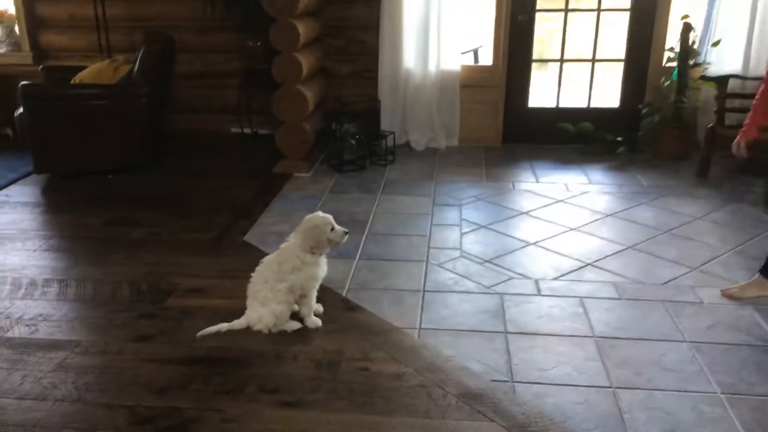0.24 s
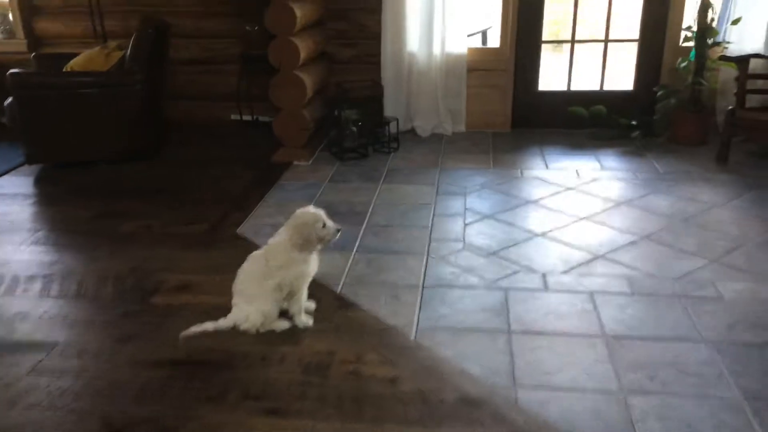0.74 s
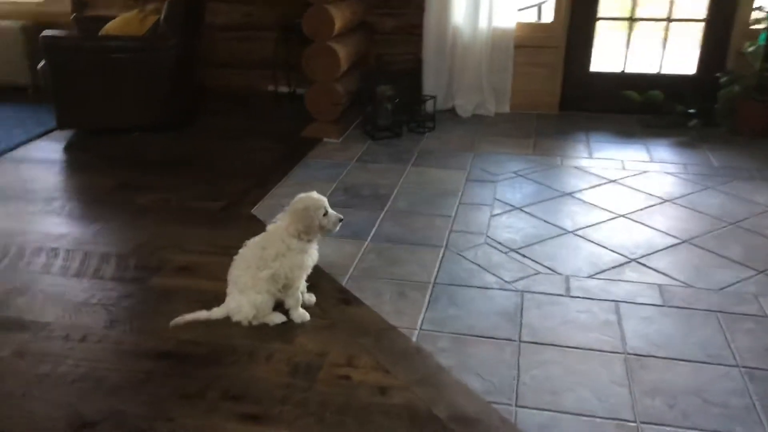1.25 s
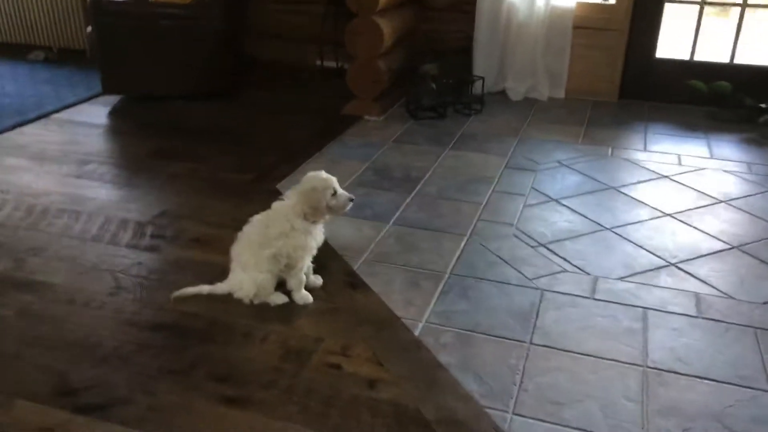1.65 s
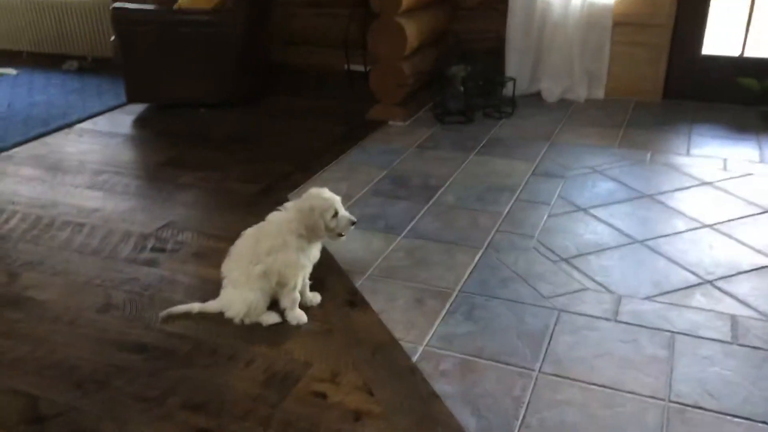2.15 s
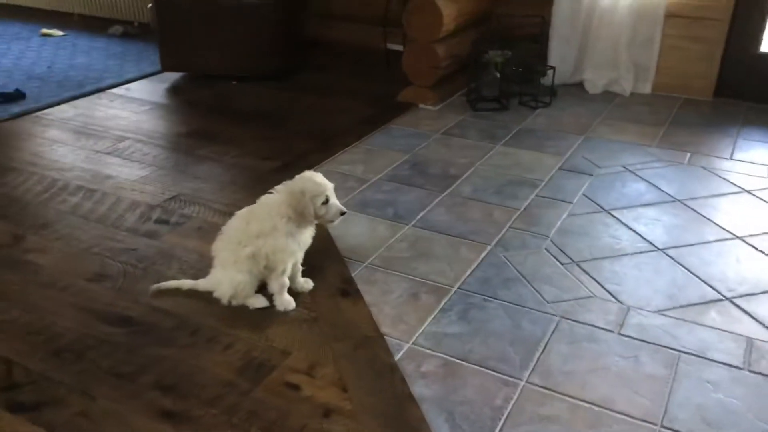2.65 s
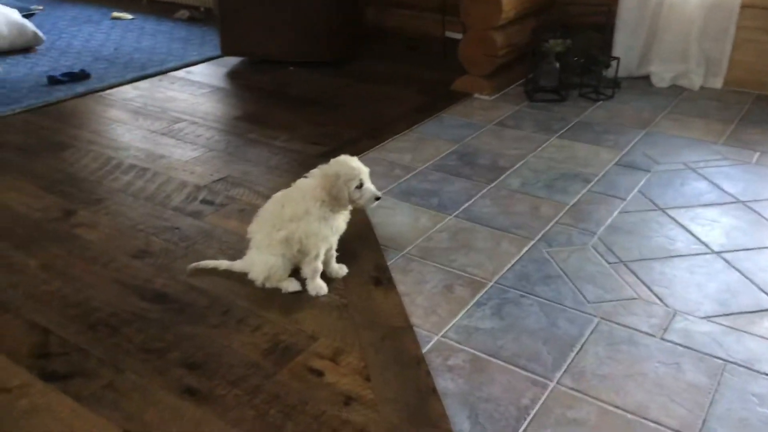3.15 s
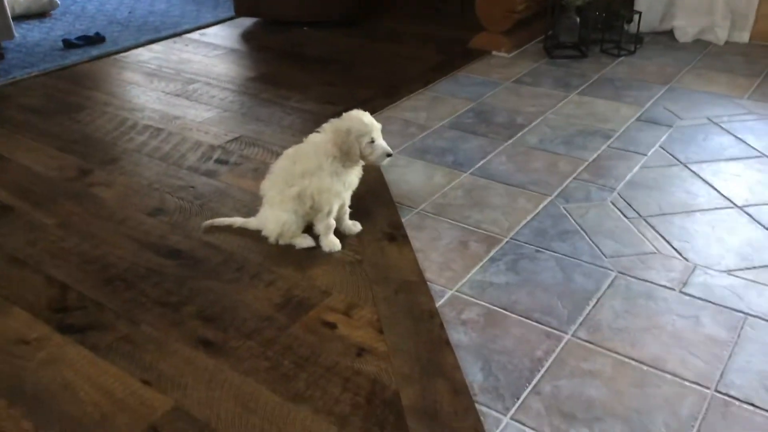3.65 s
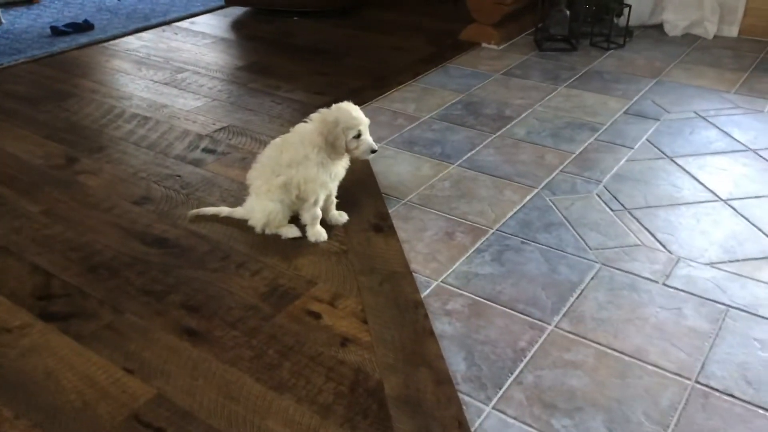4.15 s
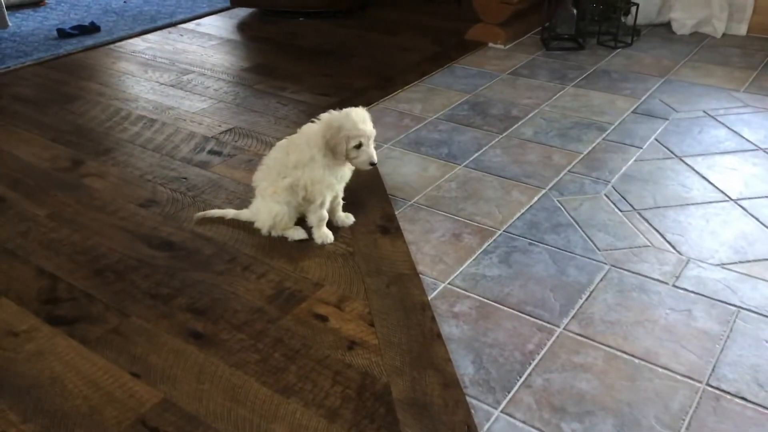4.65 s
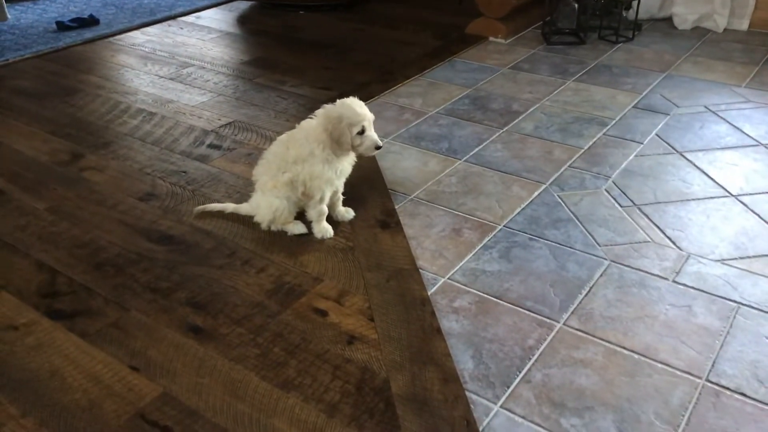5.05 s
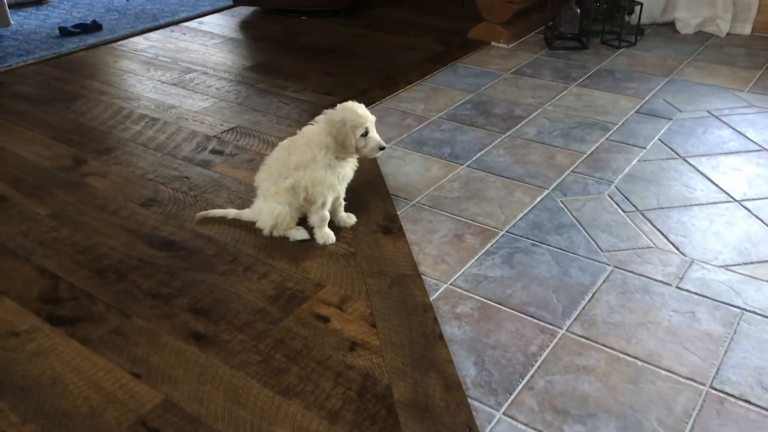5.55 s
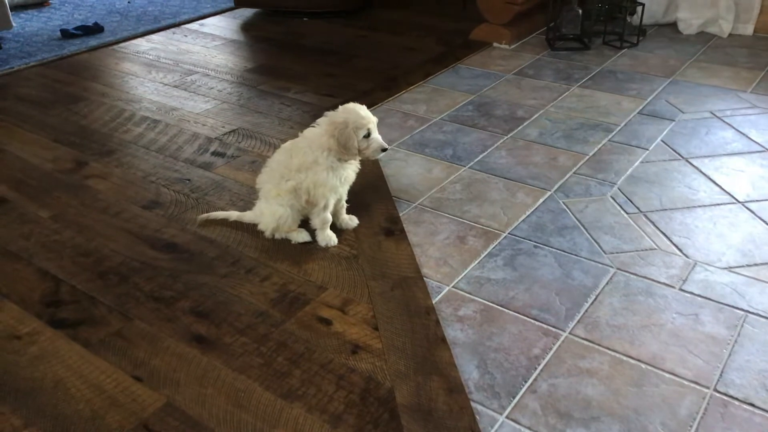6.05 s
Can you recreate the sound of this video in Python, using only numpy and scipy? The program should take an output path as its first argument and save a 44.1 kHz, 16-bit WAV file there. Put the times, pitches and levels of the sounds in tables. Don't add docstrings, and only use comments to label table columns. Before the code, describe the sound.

Soft footsteps and small scuffs and ticks on a wooden floor, then hollow knocks, two loudest mid-way, then a softer even run of taps indoors.

```python
import sys
import numpy as np
from scipy import signal
from scipy.fft import rfft, irfft, next_fast_len
from scipy.io import wavfile
from scipy.ndimage import map_coordinates

SR = 44100
rng = np.random.default_rng(int(sys.argv[2]) if len(sys.argv) > 2 else 0)


def wav_record(signal):
    frames = np.transpose(np.atleast_2d(signal))
    bounded = np.clip(frames, -1, 1)
    quanta = np.round(bounded * 32767).astype(np.int16)
    wavfile.write(sys.argv[1], SR, quanta)


def level_to_linear(level):
    exponent = np.asarray(level, float) / 20
    return 10 ** exponent


N = 277389
TAIL = 5 * SR // 8

# (time [s], crack peak [dB], boom [dB], body [dB re crack], brightness [dB re crack])
KNOCKS = [(0.8827, -62, -57.5, 13, -7), (1.0111, -47.5, -71, -22, -37), (1.0965, -53, -53, -9, -14),
          (1.542, -43.5, -29, -6.5, -6.5), (1.7387, -34, -25.5, -10, -10), (1.9066, -32, -34.5, -1.5, -7),
          (2.1262, -36, -33.5, -6, -8), (3.1268, -27, -22.5, -5, -7), (3.327, -17.5, -21.5, -1, -4.5),
          (4.985, -45, -43, -4, -14), (5.1588, -48, -43.5, -3, -11.5), (5.3349, -55, -50.5, -1.5, -14),
          (5.5412, -46, -44, -3, -13.5), (5.7445, -48, -41, -5, -11), (5.9419, -45.5, -35, 1.5, -13.5),
          (6.1405, -39, -37.5, -6, -15)]
# (frequency [Hz], width [Hz], level [dB])
CASE = [(1347, 333, 13), (3318, 570, 13), (5340, 540, 6), (6305, 170, 14.5), (8790, 670, 21),
        (11000, 360, 15), (13940, 840, 6)]
# (frequency [Hz], level [dB])
CRACK = [(150, -22.5), (300, 3), (500, 8.5), (900, 2), (1400, -8), (1750, -12.5), (2600, -19), (4400, -28),
         (5800, -33.5), (7500, -43), (10000, -47.5), (12300, -36.5), (16000, -48.5)]


def unit(x):
    return x / np.sqrt(np.mean(x ** 2) + 1e-20)


def along(points, hz):
    f, v = np.transpose(points)
    return np.interp(np.log(hz + 1), np.log(f + 1), v)


def curve(points):
    return lambda hz: level_to_linear(along(points, hz))


def bell(hz, centre, width):
    return 1 / (1 + (2 * (hz - centre) / width) ** 2)


def humps(peaks, hz):
    return sum(db * bell(hz, centre, width) for centre, width, db in peaks)


def wobble(rate):
    knots = rng.standard_normal(int(N * rate / SR) + 4)
    return map_coordinates(knots, [np.arange(N) * rate / SR])


def coloured(x, gain):
    m = 2 * next_fast_len(len(x) // 2 + 4096)
    cepstrum = irfft(np.log(gain(np.fft.rfftfreq(m, 1 / SR)) + 1e-6), m)
    cepstrum[1:m // 2] *= 2
    cepstrum[m // 2 + 1:] = 0
    return irfft(rfft(x, m) * np.exp(rfft(cepstrum)), m)[:len(x)]


def coloured_noise(gain):
    return unit(coloured(rng.standard_normal(N), gain))


def add(track, s, sound):
    track[round(s * SR):][:len(sound)] += sound


def rings(modes, t):
    return sum(sign * level_to_linear(db - 60 * t / t60) * np.sin(2 * np.pi * hz * t) for hz, db, t60, sign in modes)


def burst(rise, t60):
    t = np.arange(TAIL) / SR
    fade = level_to_linear(-60 * np.clip(t - rise, 0, 1) / t60)
    snap = rng.standard_normal(TAIL) * np.clip(t / rise, 0, 1) ** 2 * fade
    return snap / np.linalg.norm(snap)


def room_tail():
    # (frequency [Hz], t60 [s])
    room_t60 = [(100, 0.62), (500, 0.49), (1400, 0.48), (3300, 0.53), (7000, 0.49), (12000, 0.25)]
    hz, t, z = signal.stft(rng.standard_normal(TAIL), SR, nperseg=256)
    fade = level_to_linear(-60 * t / along(room_t60, hz)[:, None])
    tail = signal.istft(z * fade, SR, nperseg=256)[1][:TAIL]
    t = np.arange(TAIL) / SR
    lumps = map_coordinates(rng.standard_normal(200), [t * 160], order=1)
    tail = tail * np.clip(t / 0.012, 0, 1) * level_to_linear(1.5 * lumps * np.exp(-t / 0.1))
    return tail / np.linalg.norm(tail)


def contact(body_db, bright_db, shape=CRACK, case=1):
    tilt = [(850, body_db), (1050, 0.046), (1700, 0.022), (2600, bright_db + 15.0)]
    return lambda hz: level_to_linear(along(shape, hz) + case * humps(CASE, hz) + along(tilt, hz))


def rumble_level():
    rest_db, walking_db, walk_ends_s = -60.5, -63, 1.6
    shake_db, shake_s = -24, 0.092
    t = np.arange(N) / SR
    power = level_to_linear(2 * rest_db) + level_to_linear(2 * walking_db) * np.clip((walk_ends_s - t) / 0.097, 0, 1)
    for s, _, boom_db, *_ in KNOCKS:
        u = np.clip((t[round(s * SR):][:SR] - s) / shake_s, 0, None)
        add(power, s, (level_to_linear(boom_db + shake_db) * u * np.exp(1 - u)) ** 2)
    return np.sqrt(power)


def background():
    # (frequency [Hz], level [dB])
    rumble_colour = [(15, -39), (25, -7.5), (69, -2.5), (107, -3.5), (130, 0), (275, -10.5), (479, -26.5),
                     (697, -25), (997, -33.5), (1240, -29.5), (1800, -45), (2340, -65), (3960, -120)]
    # (frequency [Hz], width [Hz], level [dB])
    hum_peaks = [(107, 9.2, -7), (121.46, 12, 10), (148, 2.9, 0.5)]
    # (frequency [Hz], level [dB])
    hiss_colour = [(880, -42), (1500, -18), (1630, -4), (2210, -3), (2980, -4), (3240, 1), (3770, -5.5),
                   (4720, -4), (7780, -9.5), (8790, -7.5), (14200, -14.5)]
    hiss_top = [(14300, -3), (14600, -15.0)]
    rumble = coloured_noise(curve(rumble_colour))
    drone = coloured_noise(lambda hz: sum(level_to_linear(db) * bell(hz, c, w) for c, w, db in hum_peaks))
    hiss = coloured_noise(lambda hz: level_to_linear(along(hiss_colour, hz) + along(hiss_top, hz)))
    rumble = rumble_level() * level_to_linear(2.0 + 1.9 * wobble(2.3)) * rumble
    return rumble + level_to_linear(-66 + 4.2 * wobble(3.9)) * drone + level_to_linear(-81.5) * hiss


def squeak():
    # (start [s], end [s], frequency [Hz], width [Hz], level [dB])
    rub = (3, 4, 1727, 59.5, -80)
    start, end, centre, width, db = rub
    swell = np.sin(np.pi * np.clip((np.arange(N) / SR - start) / (end - start), 0, 1))
    tone = coloured_noise(lambda hz: bell(hz, centre, width))
    return level_to_linear(db + 2.5 * wobble(21.7)) * swell * tone


def grain(depth_db):
    return rng.standard_normal(N) * level_to_linear(depth_db * wobble(70))


def scuffs():
    # (time [s], hold [s], level [dB], brightness [dB re level], air [dB re brightness])
    strokes = [(0.0, 0.014, -77.5, -.5, -11), (0.124, 0.15, -85.5, 3, -11), (0.251, 0.067, -76, 3, -3),
               (0.375, .015, -66, -12.5, -1.5), (0.432, 0.012, -72, -5.5, -13),
               (0.629, .006, -73.5, -3, -4), (0.693, 0.068, -74.5, -2, -23), (0.879, 0.032, -60.5, -19, -7),
               (0.902, 0.068, -80, 6, -29), (0.974, 0.023, -76.5, -7, -1), (1.001, 0.018, -58.5, -19.5, -5),
               (1.065, 0.082, -66.5, -13, -6.5), (1.177, .08, -71.5, -13, -10),
               (1.33, 0.16, -71, -11.5, -9), (2.23, .04, -91, -19, 7), (2.287, 0.056, -74, 7, -17),
               (2.414, .13, -82.5, -2.5, -3), (2.596, .006, -75, -11, -8), (3.582, 0.28, -72.5, -19, -13),
               (3.903, .03, -72, -11.5, -20), (3.975, .03, -80.5, -22, -2),
               (4.556, 0.058, -86.5, -13.5, -1.5), (4.71, .02, -83, -12, -0.5)]
    rise, t60 = 0.012, 0.25
    bright_colour = [(1800, -11.0), (2800, -2.5), (4500, -8.0), (6000, -25)]
    airy_colour = [(4000, -27), (5500, 6), (8000, -10), (15000, -10)]
    dull = unit(coloured(grain(2.7), contact(-7.5, -29.5)))
    bright = unit(coloured(grain(1.4), lambda hz: level_to_linear(humps(CASE, hz) + along(bright_colour, hz))))
    airy = unit(coloured(grain(5.3), lambda hz: level_to_linear(1.15 * humps(CASE, hz) + along(airy_colour, hz))))
    levels, t = np.zeros((3, N + SR)), np.arange(SR) / SR
    for s, hold, db, bright_db, air_db in strokes:
        stroke = np.clip(t / rise, 0, 1) * level_to_linear(-60 * np.clip(t - rise - hold, 0, 1) / t60)
        for level, part_db in zip(levels, (db, db + bright_db, db + bright_db + air_db)):
            add(level, s, level_to_linear(part_db) * stroke)
    return np.sum(levels[:, :N] * [dull, bright, airy], axis=0)


def steps():
    # (time [s], peak [dB], pitch [Hz], puff [dB])
    heel_falls = [(0.388, -44.5, 92, -5), (0.42, -36.5, 74.5, -7), (0.549, -42.5, 102.4, 2.5),
                  (0.653, -38, 200, -10), (0.8, -45.5, 69, 4.5), (0.896, -33, 202, 1.5),
                  (1.098, -39, 186, 1), (1.146, -38, 168.5, -3.5), (1.27, -47.5, 106.3, -3),
                  (1.334, -38.5, 182, -1), (1.467, -37, 66.5, -3), (1.929, -39, 65.2, -12),
                  (1.999, -60, 203, 23), (2.135, -38.5, 57.1, -1), (2.318, -54, 61, -6),
                  (2.41, -45, 215, 0), (5.028, -40.5, 64, 0.5)]
    # (frequency [Hz], t60 [s])
    heel_t60 = [(65, 0.15), (90, 0.2), (200, 0.073)]
    puff_colour = [(30, -12), (60, 10.5), (200, -5.0), (400, -8.5), (600, -32.0), (1000, -53)]
    out, t = np.zeros(N + SR), np.arange(TAIL) / SR
    for s, db, pitch, puff_db in heel_falls:
        fade = level_to_linear(3.0 - 60 * t / along(heel_t60, pitch))
        push = fade * (1 - np.exp(-t / 0.0051)) * np.sin(2 * np.pi * pitch * t)
        puff = coloured(burst(0.0044, 0.14) + level_to_linear(-3.0) * room_tail(), curve(puff_colour))
        add(out, s, level_to_linear(db) * (push + level_to_linear(puff_db + 31.5) * puff))
    return out[:N]


def ticks():
    # (time [s], peak [dB], body [dB re peak], brightness [dB re peak])
    contacts = [
        (0.39, -61, -28, -26),
        (0.4495, -58, -19, -23),
        (0.5985, -88, -12, 4),
        (0.6505, -52, -15, -30),
        (0.7456, -68, -24, -16),
        (1.4575, -38, -4.5, -13),
        (1.565, -50, 0.5, -18),
        (2.4409, -60, -6, -22),
        (3.931, -70.5, 0, -8),
    ]
    # (frequency [Hz], level [dB])
    tick_colour = [(120, 6), (250, 14.5), (900, 5.5), (1300, 1.5), (1750, -26), (2300, -5), (3300, 6.5),
                   (4200, -18), (5000, -32), (6500, -11), (8000, -39), (12000, -42), (16000, -44)]
    grit_tilt, push_tilt = [(1200, -0.5), (2200, -5.5)], [(1500, 4), (2500, -6)]
    out = np.zeros(N + 2 * SR)
    click = 1.0 * (np.arange(TAIL) == 50)
    for s, db, body_db, bright_db in contacts:
        colour = contact(body_db - 1.5, bright_db - 3.5, shape=tick_colour, case=0)
        snap = burst(0.00039, 0.0029) + level_to_linear(-42) * room_tail()
        grit = coloured(snap, lambda hz: colour(hz) * curve(grit_tilt)(hz))
        push = coloured(click, lambda hz: colour(hz) * curve(push_tilt)(hz))
        add(out, s, level_to_linear(db + 30.5) * (grit + push))
    return out[:N]


def knocks():
    # (frequency [Hz], level [dB], t60 [s], sign [with or against the blow])
    boards = [(64, -24, .44, 1), (85, -25, .45, 1), (121.2, -10, .33, -1), (148.7, -9, .14, 1),
              (166.4, -2, .15, -1), (193.7, -6, .19, 1), (248.7, -19, .4, 1), (295, -26, .3, 1),
              (343, -15, .11, 1)]
    # (delay [s], level [dB])
    walls = [(.0008, 0), (.0193, -9), (.0308, -11.5)]
    # (frequency [Hz], level [dB], t60 [s])
    knuckle = [(667, 2.5, 0.018), (970, -5, 0.021), (1317, 3, 0.018), (1520, -10.5, .015)]
    # (frequency [Hz], level [dB])
    furnishing = [(400, -2), (700, -0.5), (1400, 0.5), (2200, -1), (3300, 2), (5000, 0.7), (9000, -2.5)]
    out, t = np.zeros(N + 2 * SR), np.arange(TAIL) / SR
    for s, db, boom_db, body_db, bright_db in KNOCKS:
        hard_db = np.clip(db - boom_db, -12, 9)
        room_db = -5 - 0.21 * hard_db - 0.068 * (db + 43)
        upper_db, slap_db = (6, -6) if s > 4.5 else (-1, 0)

        modes = [(hz, g + upper_db * (hz > 220) + rng.normal(0, 0.8), t60, sign)
                 for hz, g, t60, sign in boards]
        boom = rings(modes, t) * (1 - np.exp(-t / 0.0002))
        for delay, echo_db in walls:
            add(out, s + delay, level_to_linear(boom_db + echo_db + 7) * boom)
        low_colour = [(40, -34.5), (65, -3), (90, 5.5), (200, 0.0), (350, upper_db - 5.0),
                      (500, -24.5), (900, -110)]
        add(out, s + 0.01495, level_to_linear(boom_db + 35.5) * coloured(room_tail(), curve(low_colour)))

        modes = [(hz * rng.normal(1, 0.042), g + body_db * (hz < 900), t60, 1) for hz, g, t60 in knuckle]
        knock = rings(modes, t) * (1 - np.exp(-t / 0.001))
        add(out, s, level_to_linear(db + 3 + 0.2 * hard_db) * knock)

        colour = contact(body_db, bright_db)
        rise = np.clip(0.003 * level_to_linear(-0.6 * (db - boom_db + 4)), 0.001, 0.005)
        snap = burst(rise, 0.009)
        crack_tilt = [(1200, -5), (2000, -8.0), (5000, -0.5), (7000, 12.5 + 0.61 * slap_db),
                      (9000, 0.5), (13000, 4.5 + 2.5 * slap_db)]
        crack = coloured(snap, lambda hz: colour(hz) * curve(crack_tilt)(hz))
        add(out, s - rise - 0.0003, level_to_linear(db + 24.5 - 0.3 * hard_db + 0.18 * slap_db) * crack)
        answer = coloured(room_tail(), lambda hz: colour(hz) * curve(furnishing)(hz))
        add(out, s, level_to_linear(db + room_db + 32) * answer)

        slap_colour = [(2000, -32.5), (5000, -3.5), (8000, -12.5), (15000, -14.0 + 1.1 * slap_db)]
        slap = coloured(burst(rise, 0.013) + level_to_linear(4.0) * room_tail(),
                        lambda hz: level_to_linear(0.5 * humps(CASE, hz) + along(slap_colour, hz)))
        add(out, s - rise, level_to_linear(boom_db + slap_db - 5) * slap)
    return out[:N]


def scene():
    return (background() + squeak() + scuffs() + steps() + ticks() + knocks())[None]


def top_cut(x):
    return signal.sosfilt(signal.butter(12, 16450, fs=SR, output="sos"), x)


def record(dry):
    response = [(20, -42.5), (33, -16), (45, -1.0), (15600, -1), (15900, -38.5)]
    heard = coloured(dry[0], curve(response))
    return top_cut(heard[None])


dry = scene()
out = record(dry)
wav_record(out)
```